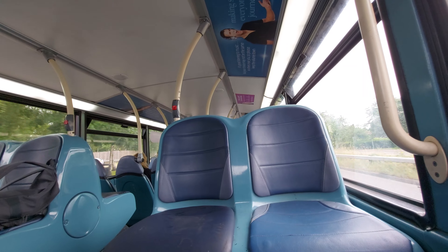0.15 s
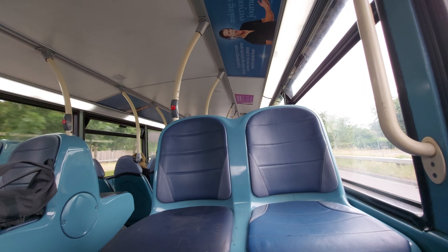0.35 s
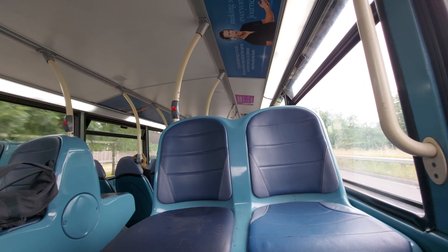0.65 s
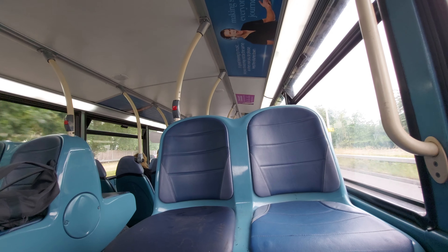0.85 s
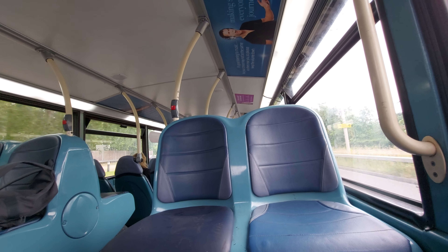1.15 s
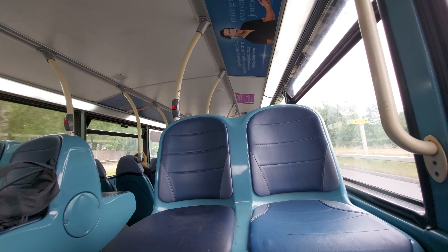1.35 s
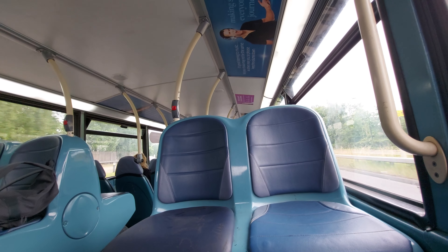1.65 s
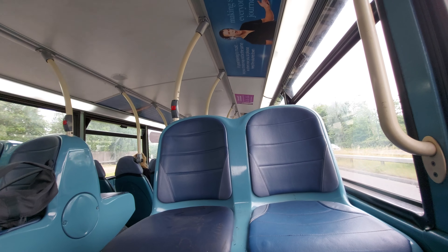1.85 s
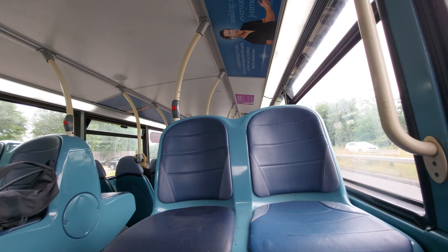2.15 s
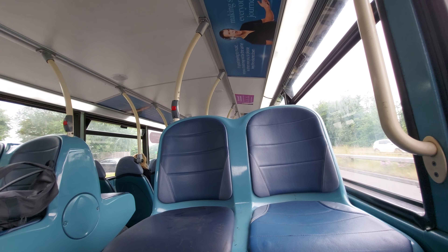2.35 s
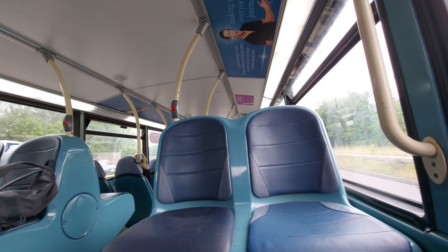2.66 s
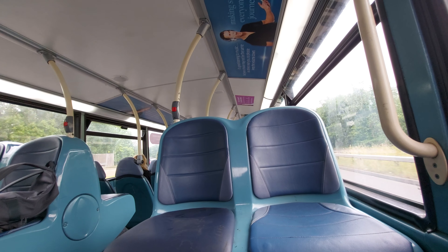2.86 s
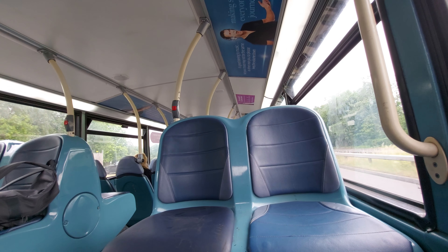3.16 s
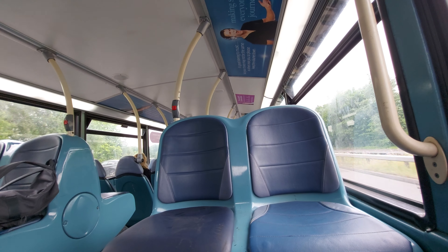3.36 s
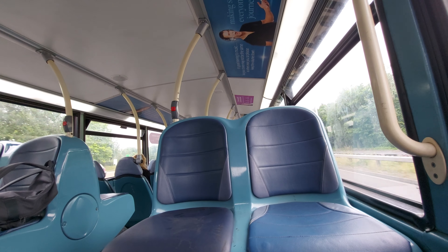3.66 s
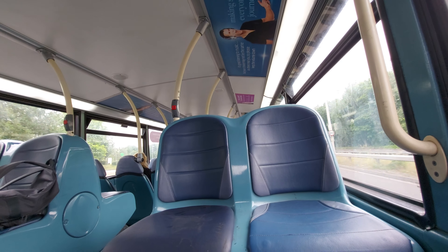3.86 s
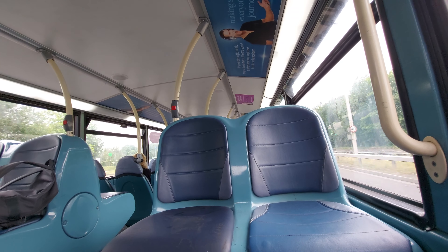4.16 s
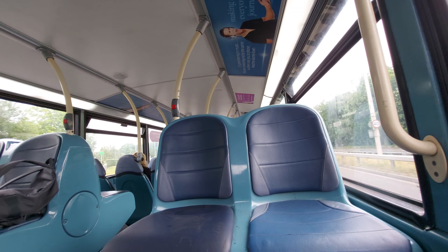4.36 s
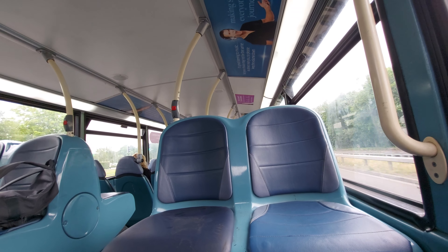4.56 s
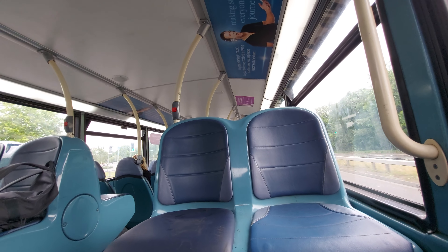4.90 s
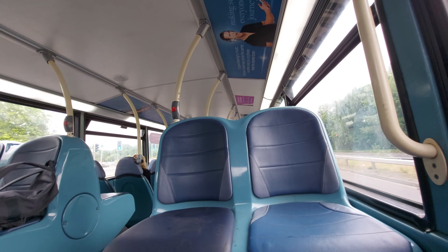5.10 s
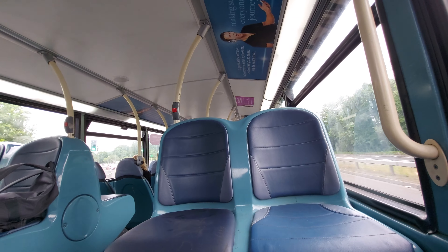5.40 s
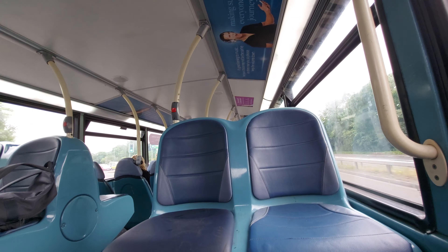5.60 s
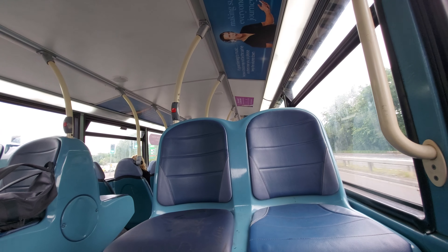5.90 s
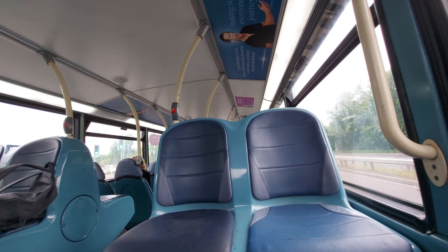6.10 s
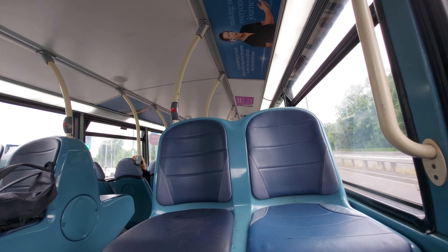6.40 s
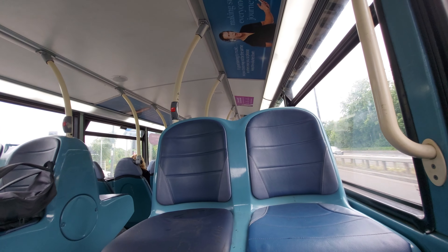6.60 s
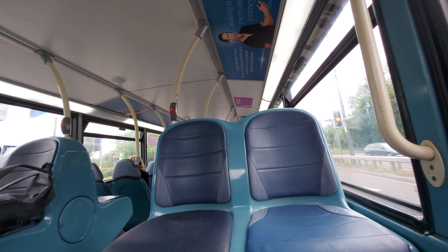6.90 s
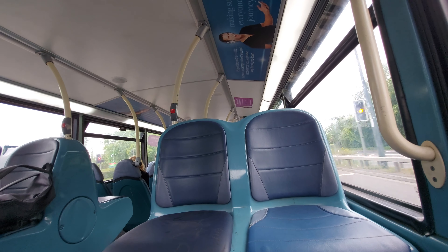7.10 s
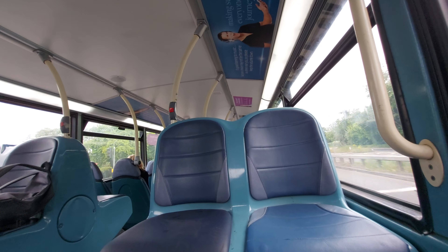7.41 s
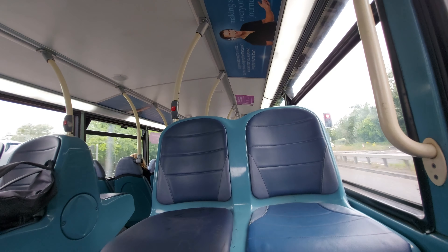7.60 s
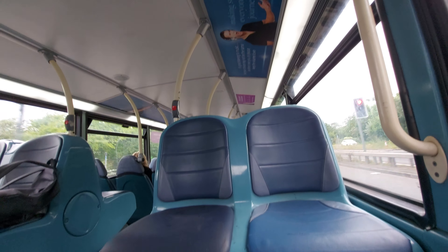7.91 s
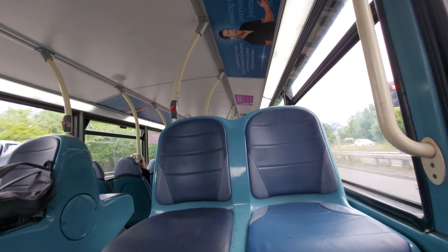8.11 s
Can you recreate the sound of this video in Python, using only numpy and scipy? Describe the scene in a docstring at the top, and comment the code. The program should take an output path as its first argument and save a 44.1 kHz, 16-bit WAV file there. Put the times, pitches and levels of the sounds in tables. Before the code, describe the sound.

A deep diesel boom fills the upper deck of a moving bus, over a steady rumble of tyres. From the start the engine climbs in pitch, with a soft gear whine. Bumps knock the panels dully in the first second, and around 2 seconds a loose plastic fitting ticks quickly among brief trim squeaks; scattered ticks continue throughout. From about 4 seconds the boom thins into a throbbing growl, while roar, road noise, hiss and a faint high turbo whistle swell to a peak near 5.5 seconds. At about 5.8 seconds the bus changes up: the pitch drops, the roar eases and the boom returns, rising slowly again. Light squeaks follow from 6 seconds, with a thin high one from about 7. Between 7 and 8 seconds several bumps clatter the panels and rattle small parts as the engine keeps pulling.

```python
"""A diesel boom fills the upper deck of a bus, over the rumble of tyres on a main road.
The six cylinders rev out into a throbbing growl, the bus changes up near 5.8 s and pulls again.
Engine orders and gear whine sweep through the cabin's resonances; roar, hiss and turbo whistle
swell as the engine strains. Trim squeaks as it rubs, bumps clatter the panels, a loose fitting ticks."""
import sys
import numpy as np
from scipy import signal
from scipy.io import wavfile

SR = 44100
rng = np.random.default_rng(int(sys.argv[2]) if len(sys.argv) > 2 else 0)


def waveform_to_disk(signal):
    """Save audio, clipped to [-1, 1], as 16-bit WAV at the path in sys.argv[1]."""
    frames = np.transpose(np.atleast_2d(signal))
    scaled = np.clip(frames, -1, 1) * 32767
    samples = np.round(scaled).astype(np.int16)
    wavfile.write(sys.argv[1], SR, samples)


N = 363825
TIME = np.arange(N) / SR

# stereo width of the cabin: f/Hz, side minus mid/dB
CABIN_WIDTH = [(60, -37.5), (130, -11), (250, -10), (500, -5), (1000, 4.5), (2000, 0), (12000, 1)]
# stereo balance of the cabin: f/Hz, left minus right/dB
CABIN_BALANCE = [(60, -1.5), (110, 0), (200, -2), (380, 1.5), (700, 0), (1290, 0.5), (2380, 1),
                 (4400, -1.5), (8120, -4.5), (15000, -1.5)]
# colour of rustling trim and rattling small parts: f/Hz, density/dB
TRIM_COLOUR = [(1800, -10.5), (3000, 3), (4000, -1), (5000, -1.5), (6300, -1.5), (8300, -1.5), (9600, -7),
               (11000, -6), (12800, -8.5), (14000, -17.5), (15700, -9)]
# rough stretches of road that stir the trim: t/s, half length/s, hiss lift/dB
ROUGH_STRETCHES = [(.15, 0.4, 3.5), (1.88, .25, 4), (2.48, 0.17, 3), (4.1, 0.48, 2.5), (6.05, .08, 2.5),
                   (6.93, 0.15, 5), (7.55, 0.34, 4), (8, .15, 4)]


def from_db(db):
    """Decibels to gain."""
    return 10 ** (np.asarray(db) / 20)


def in_time(rows):
    """A curve of (t/s, value) at every sample."""
    return np.interp(TIME, *np.transpose(rows))


def at_hz(points, hz):
    """A spectrum read on a log-frequency axis."""
    freqs, levels = np.transpose(points)
    return np.interp(np.log(hz), np.log(freqs), levels)


def swells(rows):
    """Bell-shaped level moves in dB, one per row of t/s, half length/s, level/dB."""
    return sum(db * np.exp(-((TIME - s) / half_s) ** 2) for s, half_s, db in rows)


def angle_of(hz):
    """Running phase of a rotation."""
    return 2 * np.pi * np.cumsum(hz) / SR


def pan(db):
    """Left and right gains for a level difference."""
    return from_db(np.array([[db], [-db]]) / 2)


def drift(rate_hz):
    """Random wander of rms 1: coarse noise through a double one-pole low-pass."""
    step, settle = 40, 2000
    pole = np.exp(-2 * np.pi * rate_hz * step / SR)
    coarse = rng.standard_normal(N // step + settle + 2)
    slow = signal.lfilter([1], [1, -2 * pole, pole * pole], coarse)[settle:]
    slow /= np.sqrt(np.mean(slow ** 2))
    return np.interp(np.arange(N) / step, np.arange(len(slow)), slow)


def rough_tone(angle, width_hz):
    """A tone whose strength and phase tumble at random; rms 1."""
    return drift(width_hz) * np.sin(angle) + drift(width_hz) * np.cos(angle)


def resonance(x, hz, width_hz):
    """A resonant band with gain 1 at its peak."""
    return signal.lfilter(*signal.iirpeak(hz, hz / width_hz, fs=SR), x)


def clicks_of(events):
    """One click per row of t/s, level/dB."""
    out = np.zeros(N)
    for s, db in events:
        out[round(s * SR)] += from_db(db)
    return out


def ring(clicks, hz, t60):
    """Each click strikes a decaying sine of its own height."""
    pole = np.exp(-np.log(1000) / (t60 * SR))
    turn = 2 * np.pi * hz / SR
    return signal.lfilter([0, np.sin(turn)], [1, -2 * pole * np.cos(turn), pole * pole], clicks + 1e-18)


def die_away(clicks, t60):
    """Each click becomes a falling exponential."""
    return signal.lfilter([1], [1, -np.exp(-np.log(1000) / (t60 * SR))], clicks + 1e-18)


def pull_gain(strain, start_db, db_per_s, strain_db):
    """Gain of a layer that grows as the bus gathers speed and the engine strains."""
    return from_db(start_db + db_per_s * TIME + strain_db * strain)


def cabin_noise(colour, flicker_db):
    """Bands of flickering noise, centred in the bass and diffuse above; rms 1 in the middle."""
    edges = np.geomspace(20, 17000, 25)
    white = rng.standard_normal((2, 2, N))
    out = 0
    for k, (low, high) in enumerate(zip(edges, edges[1:])):
        hz = np.sqrt(low * high)
        if colour[0][0] <= hz <= colour[-1][0]:
            band = signal.butter(2, [low, high], "band", fs=SR, output="sos")
            mid, side = signal.sosfilt(band, white[k % 2])
            side = side * from_db(at_hz(CABIN_WIDTH, hz))
            gain = from_db(at_hz(colour, hz) + flicker_db * drift(11))
            out += gain * np.array([mid + side, mid - side]) * pan(at_hz(CABIN_BALANCE, hz))
    return out / np.std(out.mean(axis=0))


def cabin_tone(angle, level_db):
    """A tone that standing waves spread between the two sides, wider in the treble than in the bass."""
    mean_hz = (angle[-1] - angle[0]) / (2 * np.pi * TIME[-1])
    mid = np.sin(angle)
    side = from_db(at_hz(CABIN_WIDTH, mean_hz) - 3) * rng.choice([-1, 1]) * np.cos(angle)
    stereo = np.array([mid + side, mid - side]) * pan(at_hz(CABIN_BALANCE, mean_hz))
    return np.sqrt(2) * from_db(level_db) * stereo


def cabin_db(order, firing_hz):
    """What the cabin adds to an order (a multiple of the cycle rate) as the revs sweep it along."""
    # cabin resonances and nulls: f/Hz, half width/Hz, level/dB
    modes = [(109, 3, 3), (122, 4, -24), (128, 7, 6), (147, 1.5, -15), (154, 4, 6), (225, 6, 7),
             (255, 10, 13), (278, 11, 6), (387, 8, 14), (435, 12, 13), (700, 30, 5), (830, 19, 11)]
    hz = order * firing_hz[::100] / 6
    body_db = sum(db / (1 + ((hz - centre) / width) ** 2) for centre, width, db in modes)
    return np.interp(TIME, TIME[::100], body_db)


def exhaust_boom(cycle, firing_hz, waver_db=0.56):
    """The clean firing tone fills the whole body, until the revs climb past its resonance."""
    # the body's answer to the firing tone: f/Hz, level/dB
    body_response = [(67, -11), (74, -11), (80, -9.5), (83, -8.5), (86, -10), (88.5, -17.5), (92.5, -21),
                     (95, -15.5), (97.5, -17.5)]
    # a surge at the gear change, a surge and sag at a bump: t/s, half length/s, level/dB
    surges = [(5.915, 0.054, 3), (7.96, .04, 3.5), (8.07, 0.054, -2)]
    level_db = at_hz(body_response, firing_hz) + swells(surges) + waver_db * drift(6.2)
    return cabin_tone(6 * cycle, level_db)


def engine_growl(cycle, firing_hz, mid_revs_hz=80, waver_db=1.5, smear_rad=0.007):
    """Unequal cylinders sound other orders; the two beside the firing tone keep step with it and throb."""
    # engine partials by order: level at mid revs/dB, slope with firing rate/(dB per Hz)
    partials = {4: (-45.5, 0), 5: (-40, 1), 7: (-34, 0), 8: (-32.5, -0.33), 9: (-28, -0.31), 10: (-45, .5),
                11: (-39.5, -0.76), 12: (-33.5, -0.77), 13: (-49, 0.075), 14: (-54, 0.93), 15: (-58, 0.18),
                16: (-46, 0.11), 17: (-53.5, -0.87), 18: (-56.5, 1), 20: (-46, 0), 21: (-51.5, 0.22),
                22: (-55.5, 0.17), 24: (-43, 0.24), 25: (-55.5, -1), 26: (-55.5, .1), 28: (-53, 0),
                30: (-55.5, 0.28), 32: (-51, 0.6), 33: (-56, 0.55), 40: (-55, 0), 48: (-59, -0.11)}
    throb_orders = (5, 7)
    out = 0
    for order, (mid_db, db_per_hz) in partials.items():
        level_db = mid_db + db_per_hz * (firing_hz - mid_revs_hz) + cabin_db(order, firing_hz)
        offset = rng.uniform(0, 2 * np.pi) * (order not in throb_orders)
        angle = order * (cycle + smear_rad * drift(1.2)) + offset
        out += cabin_tone(angle, level_db + waver_db * drift(2.6))
    return out


def tyre_rumble(strain):
    """Tyres rumble up through the body, which adds a hollow drone."""
    # colour of the rolling tyres: f/Hz, density/dB
    colour = [(45, -5), (55, -0.5), (80, 8), (120, 0), (180, -3.5), (270, -4.5), (340, -7), (430, -4.5),
              (560, -20.5), (800, -21), (1400, -52)]
    # swells on coarse road, dips on smooth: t/s, half length/s, level/dB
    surface = [(2.1, .5, 0), (3.45, .65, -5), (5.7, 0.1, 2), (7.8, 0.3, 2)]
    road = cabin_noise(colour, flicker_db=1)
    drone = from_db(2) * resonance(road, hz=266, width_hz=27)
    gain = pull_gain(strain, start_db=-28, db_per_s=0.06, strain_db=6.5)
    return gain * from_db(swells(surface)) * (road + drone)


def road_shudder(gain_db=1):
    """The deepest road rumble heaves under everything else."""
    # rise and fall of the shudder: t/s, level/dB
    heave = [(0.1, -38.5), (1.53, -45.5), (6.56, -41), (6.74, -35), (8.15, -39)]
    # its sub-bass colour: f/Hz, density/dB
    colour = [(20, -9), (36, -1), (50, -0.5)]
    return from_db(in_time(heave) + gain_db) * cabin_noise(colour, flicker_db=1.5)


def engine_roar(cycle, strain):
    """Midrange noise pulses with the firings, opens up under strain and lifts a little on rough road."""
    # colour of the roar: f/Hz, density/dB
    colour = [(350, -10.5), (500, 7), (650, 2.5), (800, -3.5), (1050, -3), (1300, -5.5), (1600, -10),
              (2050, -9.5), (2600, -22), (3300, -27), (5000, -30)]
    gain = pull_gain(strain, start_db=-44, db_per_s=0.2, strain_db=5.7)
    road_lift = from_db(0.4 * swells(ROUGH_STRETCHES))
    pulse = 1 + 0.089 * np.sin(6 * cycle)
    return gain * road_lift * pulse * cabin_noise(colour, flicker_db=0.9)


def trim_hiss(cycle, strain):
    """A hiss that shakes once an engine cycle and swells as rough road sets the trim rustling."""
    gain = pull_gain(strain, start_db=-57.5, db_per_s=0.11, strain_db=7)
    road_lift = from_db(swells(ROUGH_STRETCHES))
    shake = 1 + 0.038 * np.sin(cycle)
    return gain * road_lift * shake * cabin_noise(TRIM_COLOUR, flicker_db=1.65)


def turbo_whistle(strain, line_width_hz=35, skirt_width_hz=450, skirt_db=1):
    """A thin blade whistle inside a skirt of intake turbulence, louder under strain."""
    # blade tone as the turbo spools up and down: t/s, f/Hz
    spool = [(0, 10400), (.8, 10840), (1.5, 11320), (3.3, 12420), (4.7, 12950), (5.55, 13220), (5.8, 12750),
             (6.05, 12000), (6.5, 11610), (7.3, 11540), (8.25, 11680)]
    angle = angle_of(in_time(spool))
    sides = [rough_tone(angle, line_width_hz) + from_db(skirt_db) * rough_tone(angle, skirt_width_hz)
             for _ in range(2)]
    return from_db(-64 + 7.9 * strain) * np.array(sides) * pan(db=-3)


def gear_whine(cycle, firing_hz, fade_s=0.2, gain_db=1.5, waver_db=1.5, smear_rad=0.25):
    """Each gear sings while it carries the load; each of its tones blooms around one engine speed."""
    # tones of the low gear: order, level/dB, loudest firing rate/Hz, half width/Hz
    low_gear = [(16.75, -39.5, 81.5, 5.5), (20.3, -42.5, 78.3, 4), (52.25, -52.5, 79.5, 6),
                (52.25, -54, 96.3, 2.4), (60.55, -55, 71, 4.5), (60.55, -58.5, 81.5, 2.5),
                (52.25, -57, 86, 2.5), (72, -56, 90, 4)]
    # tones of the high gear: same columns
    high_gear = [(22.5, -44, 70.3, 1), (74, -58, 73, 3), (79, -57, 74, 1.3), (85.7, -55, 72, 2)]
    low_out_s, high_in_s = 5.75, 6.15
    out = 0
    for tones, loaded_s in ((low_gear, low_out_s - TIME), (high_gear, TIME - high_in_s)):
        load = np.clip(loaded_s / fade_s, 0, 1)
        for order, db, loudest_hz, width_hz in tones:
            bloom = np.exp(-((firing_hz - loudest_hz) / width_hz) ** 2)
            level_db = gain_db + db + cabin_db(order, firing_hz) + waver_db * drift(5.6)
            out += load * bloom * cabin_tone(order * cycle + smear_rad * drift(6), level_db)
    return out


def trim_squeaks(wobble=0.004, rasp_db=-2.5, octave_db=-13, gain_db=-3.7, grip_db=3.2):
    """Stick and slip: a wobbling tone catches and lets go, in a rasp of friction, with a weak octave."""
    # rubs of the trim: t/s, length/s, start f/Hz, end f/Hz, level/dB
    rubs = [(.178, .3, 4940, 5630, -56.5), (1.973, 0.081, 4340, 4300, -50), (2.024, .08, 3230, 3240, -55),
            (2.129, .063, 2190, 2300, -46.5), (4.45, .08, 5495, 5450, -58), (5.45, 0.084, 5430, 5350, -51),
            (6.13, 0.22, 1780, 1795, -49.5), (6.32, 0.26, 2020, 2020, -51), (6.83, 0.15, 5600, 5500, -46),
            (6.95, 0.49, 5590, 5670, -56), (7.33, 0.58, 5540, 5600, -52), (7.876, 0.27, 5540, 5590, -50)]
    hz, envelope = np.zeros(N), np.zeros(N)
    for s, length, start_hz, end_hz, db in rubs:
        span = np.flatnonzero((TIME >= s) & (TIME < s + length))
        hz[span] = np.linspace(start_hz, end_hz, len(span))
        envelope[span] += from_db(db) * signal.windows.tukey(len(span), 0.6)
    angle = angle_of(hz * (1 + wobble * drift(25)))
    sides = []
    for _ in range(2):
        squeal = rough_tone(angle, width_hz=50)
        rasp = from_db(rasp_db) * rough_tone(angle, width_hz=350)
        octave = from_db(octave_db) * rough_tone(2 * angle, width_hz=100)
        sides.append(squeal + rasp + octave)
    return from_db(gain_db + grip_db * drift(8)) * envelope * np.array(sides)


def panel_clatter(clack_cutoff_hz=3300, flutter_db=1):
    """Bumps clack the panels dully against their frames; they chatter on, and small parts rattle."""
    # bumps in the road: t/s, panel level/dB, bright rattle level/dB
    bumps = [(0.404, -37, -53), (0.852, -31.5, -56), (4.9861, -38.5, -53), (6.1053, -39, -52),
             (6.7034, -39, -57), (7.243, -31, -59), (7.3334, -33.5, -55), (7.7233, -31, -63),
             (7.7663, -36.5, -69), (7.892, -29.5, -49), (7.9274, -32, -49)]
    # colour of the wall panels: f/Hz, density/dB
    colour = [(400, -8.5), (900, 5.5), (1400, 3), (2000, 4), (3000, -1), (4000, -11.5), (6000, -13.5),
              (8300, -23), (10000, -32.5), (15000, -29.5)]
    panel_hits = clicks_of([(s, db) for s, db, _ in bumps])
    rattle_hits = clicks_of([(s, db) for s, _, db in bumps])
    panel = cabin_noise(colour, flicker_db=2)
    dull = signal.butter(2, clack_cutoff_hz, fs=SR, output="sos")
    clack = signal.sosfilt(dull, from_db(-6.5) * die_away(panel_hits, t60=0.085) * panel)
    chatter = from_db(-14.5) * die_away(panel_hits, t60=0.56) * panel
    rattle = from_db(-0.5) * die_away(rattle_hits, t60=0.31) * cabin_noise(TRIM_COLOUR, flicker_db=1)
    return clack + from_db(flutter_db * drift(90)) * (chatter + rattle)


def fitting_ticks(cycle, chance_per_cycle=0.45, shell_band_hz=(3200, 4500)):
    """A loose plastic fitting ticks hollowly; engine shake adds faint ticks, louder on rough road."""
    # the distinct ticks: t/s, level/dB
    ticks = [(0.9674, -37.5), (1.6367, -37), (1.7145, -36), (1.7679, -30.5), (1.8452, -28), (1.9225, -31.5),
             (1.9736, -31.5), (2.05, -34.5), (2.2008, -42), (2.2275, -36), (2.599, -39), (3.386, -40),
             (4.0213, -37), (4.0881, -34), (4.157, -39), (5.127, -34), (5.5308, -35), (5.8394, -34),
             (5.91, -33.5), (5.9818, -31.5), (6.0092, -35), (7.3172, -35), (7.672, -35), (7.8337, -27),
             (8.0184, -33), (8.2056, -31.5)]
    # modes of the fitting: f/Hz, level/dB, t60/s
    modes = [(3520, -1, .014), (3800, -1, .01), (4200, -2.5, .012)]
    new_cycle = np.diff(cycle // (2 * np.pi), prepend=0) > 0
    shaken = new_cycle & (rng.random(N) < chance_per_cycle)
    faint_db = -48 + 1.7 * swells(ROUGH_STRETCHES) + 1.6 * rng.standard_normal(N)
    clicks = clicks_of(ticks) + shaken * from_db(faint_db)
    direct = 0
    for hz, db, t60 in modes:
        scatter_db = 0.83 * rng.standard_normal((2, 1)) * drift(29)
        direct += ring(clicks * from_db(db + scatter_db), hz, t60)
    cabin_tail = from_db(-7.5) * die_away(clicks, t60=0.22) * rng.standard_normal((2, N))
    shell = signal.butter(2, shell_band_hz, "band", fs=SR, output="sos")
    return signal.sosfilt(shell, from_db(-5.5) * direct * pan(db=-1) + cabin_tail)


def scene():
    """A four-stroke cycle of six firings drives the engine sounds; strain lags behind high revs."""
    # a long pull, the change up and a slower pull: t/s, firing rate/Hz
    revs = [(0, 66.9), (.3, 68.5), (1.8, 77.38), (3, 84.05), (3.4, 86.7), (4.6, 92.8), (5.3, 95.8),
            (5.5, 97.3), (5.62, 96.7), (5.72, 94.2), (6.02, 74.1), (6.15, 71.8), (6.35, 70.5), (6.9, 72.15),
            (7.55, 73.45), (7.9, 74.85), (8.25, 75.6)]
    strain_range_hz, strain_lag_s = (90, 95.5), 0.16
    firing_hz = in_time(revs)
    cycle = angle_of(firing_hz / 6)
    lagged_hz = np.interp(TIME - strain_lag_s, TIME, firing_hz)
    strain = np.interp(lagged_hz, strain_range_hz, (0, 1))
    engine = exhaust_boom(cycle, firing_hz) + engine_growl(cycle, firing_hz)
    whines = gear_whine(cycle, firing_hz) + turbo_whistle(strain)
    trim = fitting_ticks(cycle) + panel_clatter() + trim_squeaks()
    rush = tyre_rumble(strain) + road_shudder() + engine_roar(cycle, strain) + trim_hiss(cycle, strain)
    return engine + whines + trim + rush


def record(dry, cutoff_hz=15750, fade_s=0.012):
    """The microphone has a dip in the treble, the top is cut steeply, and both ends fade briefly."""
    coloured = dry - 0.61 * resonance(dry, hz=9490, width_hz=2000)
    top_cut = signal.ellip(10, 0.1, 80, cutoff_hz, fs=SR, output="sos")
    ramp = np.clip(np.minimum(TIME, TIME[-1] - TIME) / fade_s, 0, 1)
    return np.sin(np.pi / 2 * ramp) ** 2 * signal.sosfilt(top_cut, coloured)


dry = scene()
out = record(dry)
waveform_to_disk(out)
```